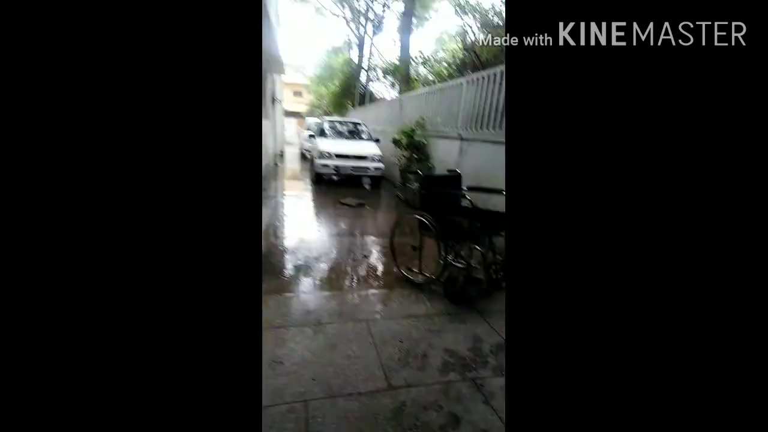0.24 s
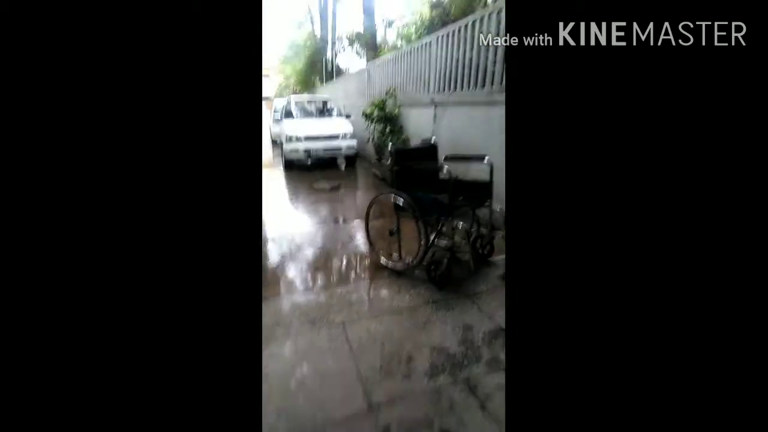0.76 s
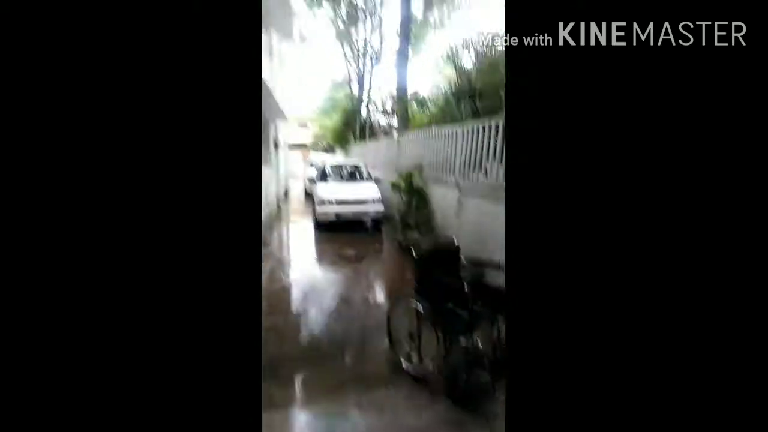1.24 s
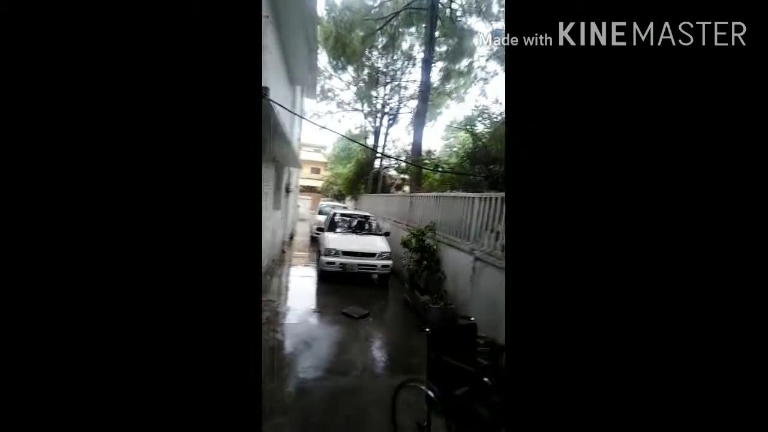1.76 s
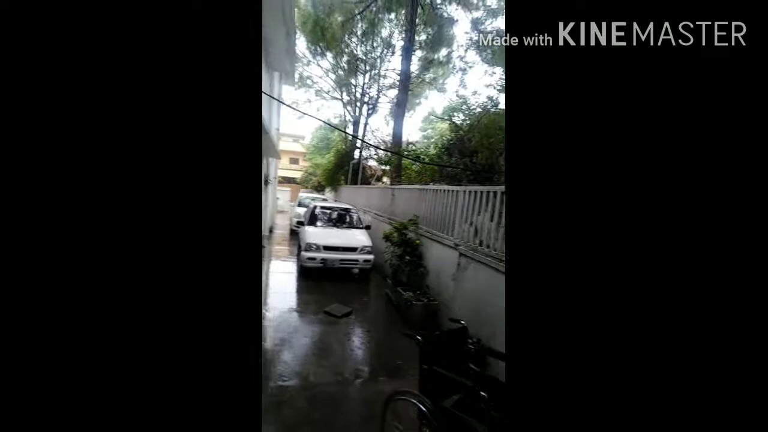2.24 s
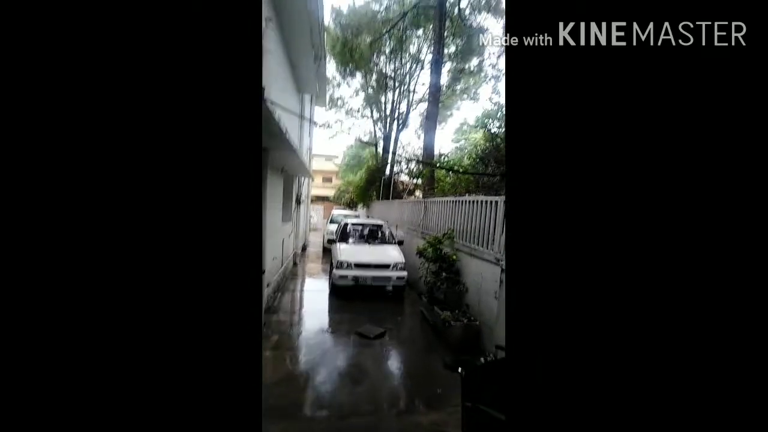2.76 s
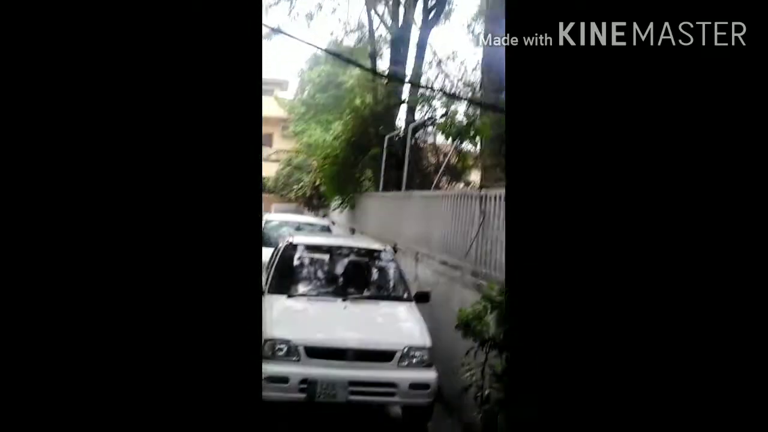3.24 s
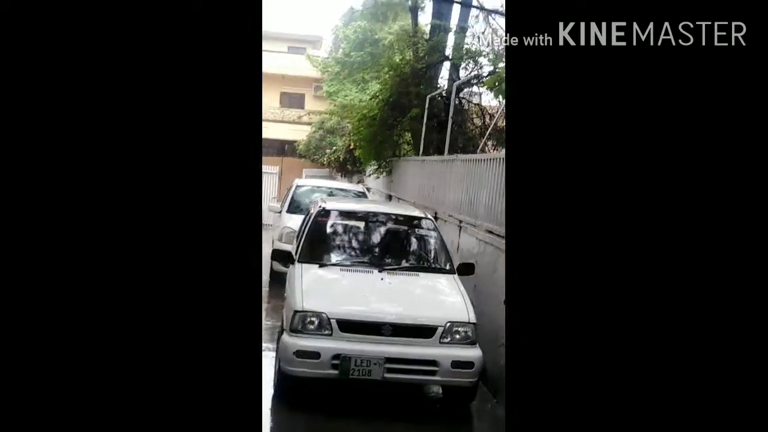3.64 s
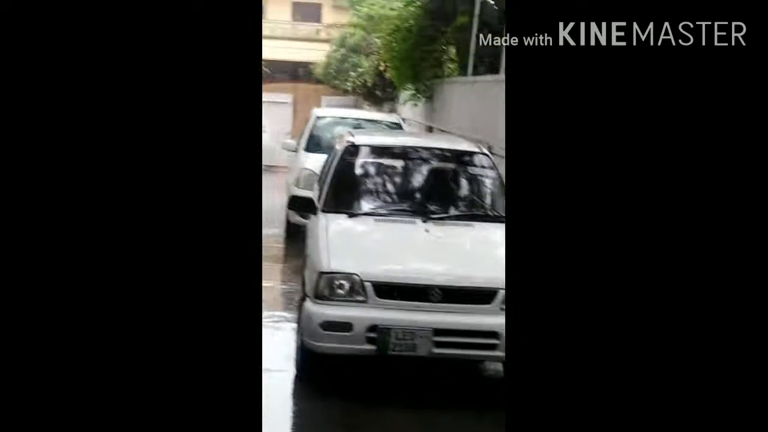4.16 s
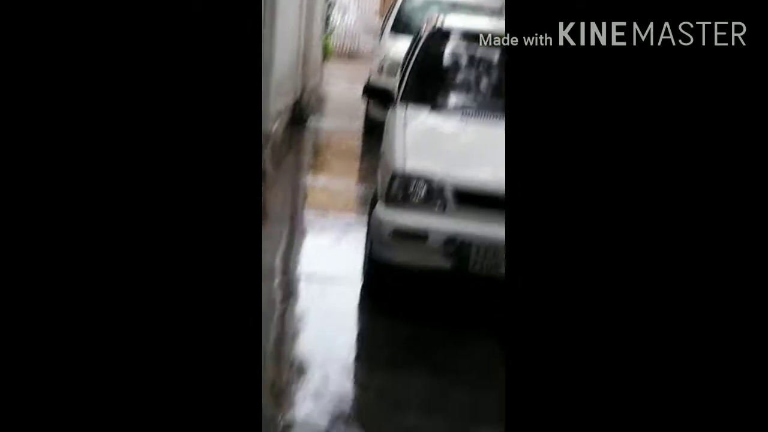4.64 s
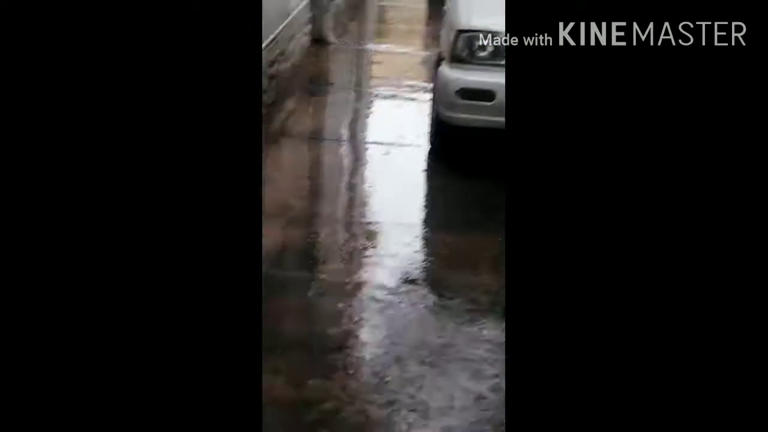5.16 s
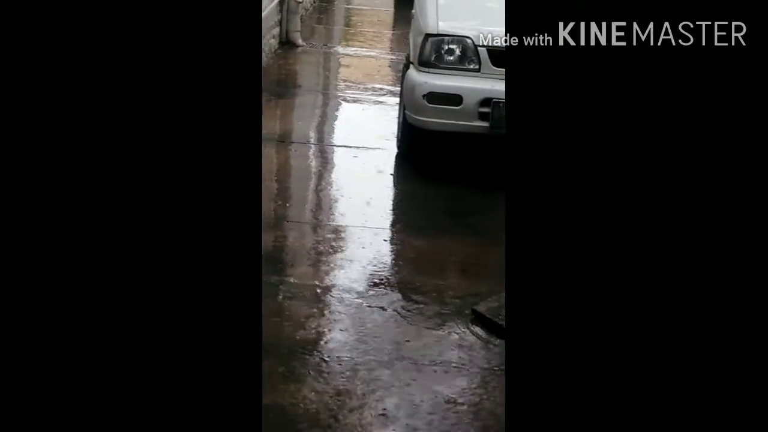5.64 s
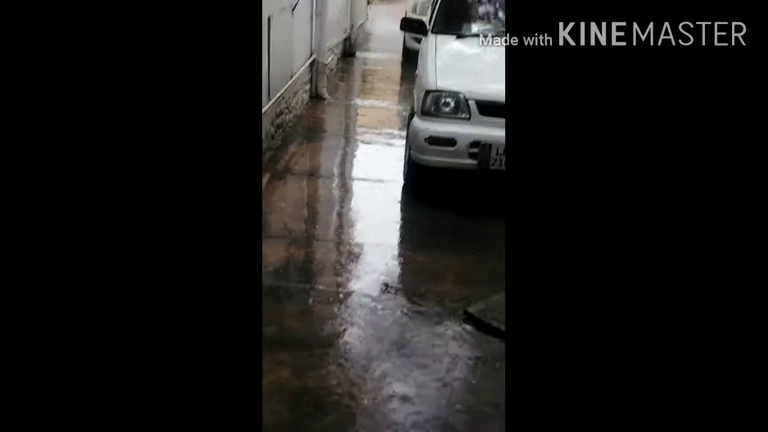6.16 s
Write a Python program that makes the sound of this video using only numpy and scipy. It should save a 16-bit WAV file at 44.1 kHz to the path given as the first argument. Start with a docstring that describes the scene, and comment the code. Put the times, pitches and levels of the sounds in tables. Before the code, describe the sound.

A handheld phone hears wide stereo rain on wet paving beside a house wall. The hiss is bright and continuous, gently fluctuating, with fine pattering. After a momentary early silence it climbs back; then fingers bump and judder over the casing. Soft shoe scuffs pass almost unnoticed. Scattered eaves drips click and splash with short outdoor reflections, loudest right at the end, over very quiet traffic rumble and engine hum.

```python
"""Steady rain on a driveway

A paved driveway between a house and a garden wall, heard in two channels from a hand-held phone.
Far drops merge into a noise hiss, nearer ones patter as short resonances, and fat drips from the eaves
smack the wet paving as noise bursts with a dying splash. Behind lie the town's rumble and an engine's wavering
hum; close by, shoes scuff softly, fingers brush and bump the casing and the hand judders over it once.
Early on the sound drops out for a moment, reopens quietly and climbs back."""
import sys
import numpy as np
from scipy import signal
from scipy.fft import rfft, irfft
from scipy.io import wavfile

SR = 44100
rng = np.random.default_rng(int(sys.argv[2]) if len(sys.argv) > 2 else 0)


def put_to_file(sound):
    """Save the sound as 16-bit audio at rate SR, in the file named by the first command-line argument."""
    columns = np.atleast_2d(sound).T  # one column per channel
    safe = np.clip(columns, -1, 1)
    whole_steps = np.round(safe * 32767)
    wavfile.write(sys.argv[1], SR, whole_steps.astype(np.int16))


N = 282240
TIME = np.arange(N) / SR
FREQS = np.maximum(np.arange(N // 2 + 1) * SR / N, 1)

# Distant town, slow course of the rumble before its wander: (time [s], level [dB])
TOWN_COURSE = [(0, -45), (.55, -48), (2.1, -48.8), (3.2, -47.5), (6.4, -46.5)]
# Colour of the town, only its shape counts: (frequency [Hz], density [dB per Hz])
RUMBLE_SPECTRUM = [(20, -25), (36, -29), (50, -11), (66, -4.5), (100, 3), (160, 1), (240, 1), (350, -1.5),
                   (500, -5.5), (900, -13.5), (1600, -23), (4000, -38)]
# Soft shoe scuffs: (time [s], level [dB], spread of the swell [s], pitch [Hz])
SHOE_SCUFFS = [(1.034, -35, .019, 850), (1.367, -40.5, .018, 1190), (3.537, -41, 0.066, 1700),
               (3.70, -40, 0.021, 1570), (5.723, -41, .04, 2420)]
# Fingers brush the casing, level ahead of the skin filter: (time [s], level [dB], spread of the swell [s])
FINGER_BRUSHES = [(.76, -48.5, 0.086), (5.925, -47.5, 0.075)]
# Fingers bump the casing, peak ahead of the skin filter:
# (time [s], peak [dB], pitch [Hz], time to fall by 60 dB [s])
CASING_BUMPS = [(.135, -38, 150, .1), (.205, -35.5, 130, 0.069), (.70, -38, 236, 0.42), (.88, -39, 221, .2),
                (1.0161, -27, 247, 0.1), (1.106, -33, 111, 0.13), (3.2998, -18.5, 190, .016)]
# Fat drips on the paving, level ahead of the water film:
# (time [s], smack level [dB], pitch [Hz], splash time constant [s])
EAVES_DRIPS = [(0.52, -12, 10500, .001), (.636, -26, 6000, 0.014), (1.14, -19, 6500, .021),
               (1.9, -26, 6000, .007), (2.717, -24, 8500, .024), (3.171, -24, 5030, .014),
               (3.563, -30, 4200, .04), (3.8013, -24, 5800, 0.03), (3.888, -19, 8440, .016),
               (4.434, -13.5, 6300, .015), (4.937, -23, 6950, 0.021), (6.047, -26, 4600, .01),
               (6.194, -21.5, 3200, .014), (6.199, -20.5, 8000, .02), (6.368, -6.5, 5400, .002),
               (6.3726, -7, 7500, .001), (6.3785, -14, 7500, .003)]
# Strength of the shower, to which spray and wash add their offsets: (time [s], level [dB])
SHOWER_COURSE = [(0, -36), (.09, -35.2), (.16, -37.6), (.95, -39.5), (1.22, -37), (1.5, -38.9),
                 (1.85, -37.5), (2.48, -38), (2.67, -39.8), (2.77, -36.4), (3.75, -36.5), (4.1, -36.5),
                 (4.6, -37), (5.5, -36), (5.95, -37), (6.4, -35.5)]
# Colour of the bright spray, only its shape counts: (frequency [Hz], density [dB per Hz])
SPRAY_SPECTRUM = [(1200, -29), (2500, -6.5), (3600, -3.5), (5000, -2), (6500, -1), (7800, 0.5), (10000, -4),
                  (12500, -11.5), (14500, -11.5)]
# Colour of the duller wash, only its shape counts: (frequency [Hz], density [dB per Hz])
WASH_SPECTRUM = [(200, -17), (420, -4.5), (650, -1), (900, -4.5), (1200, -3), (1900, -1), (2700, -3),
                 (3800, -7), (7000, -16)]
# How alike the two channels hear the hiss of the wash: (frequency [Hz], correlation [-1 to 1])
WASH_LIKENESS_CURVE = [(200, 0.44), (550, 0.18), (950, 0.4), (1500, 0.12), (3000, 0.12)]
# Colour of the left channel: (frequency [Hz], gain [dB])
LEFT_COLOUR = [(100, -0.3), (400, 1), (490, -3.5), (590, -21), (680, -26), (760, -26), (890, 0.5),
               (2100, 2), (2800, -2.5), (4700, 2), (5900, 2), (8000, -8), (11500, -12), (14000, -48)]

TOWN_WANDER_DB = 1.27
HUM_HZ, HUM_DB = 76.5, -54   # mean pitch; mean level at the engine's nearest
HUM_NEAREST_S, HUM_PASS_S = 4.05, 1.7   # moment it is nearest; time from there to fall by 3 dB
SCUFF_WIDTH_HZ = 1400
RUB_START_S, RUB_DB = 1.013, -27.5   # the hand slips over the casing; level ahead of the skin filter
RUB_ATTACK_S, RUB_HOLD_S, RUB_RELEASE_S = 0.0075, 0.061, 0.012   # the release is a time constant
JUDDER_START_HZ, JUDDER_SLOWING_S, JUDDER_SAG = 290, .008, .38   # slows as a power of time; sag: exponent
SMACK_S, ATTACK_S = .001, .0005   # time constant of the smack; rise time of a drip's soft onset
SPLASH_DB, SPLASH_FOLLOWS = -16, .5   # splash of a 0 dB smack; splash dB per dB of smack
PORT_LAG_S = .0004   # largest lag of a drop between the ports
SPRAY_DB, WASH_DB, WASH_FOLLOWS = 4.5, -9, 0.81   # offsets; the wash's share of the shower curve in dB
MUTE_START_S, MUTE_END_S, MUTE_DB = 0.252, 0.3803, -67   # the dropout and its floor
MUTE_STEP_DB, MUTE_FALL_DB_PER_S = -20.5, 1306   # it drops at once, then dies away
REOPEN_S, RETURN_DB, RETURN_S = 0.021, -8, .27   # it comes back quiet and climbs to full level
CUTOFF_HZ = 14300


def from_db(db):
    """Decibels to gain."""
    return 10 ** (np.asarray(db) / 20)


def rms_one(x):
    """Scale to an rms of 1."""
    return x / np.sqrt(np.mean(x ** 2) + 1e-20)


def in_time(rows):
    """Each column of a curve at every sample."""
    s, *columns = np.transpose(rows)
    return [np.interp(TIME, s, c) for c in columns]


def over_hz(points):
    """A table joined by straight lines over log frequency."""
    hz, value = np.transpose(points)
    return np.interp(np.log(FREQS), np.log(hz), value)


def coloured(x, spectrum):
    """Give a signal a spectral shape."""
    return irfft(rfft(x) * from_db(over_hz(spectrum)), N)


def drift(rate_hz, size=4096):
    """Smooth random wandering with an rms of 1."""
    slow = rfft(rng.standard_normal(size))
    slow = slow / (1 + (FREQS[:len(slow)] / rate_hz) ** 2)
    return rms_one(irfft(slow, N))


def swell(s, length):
    """A smooth bell-shaped rise and fall around a moment."""
    return np.exp(-.5 * ((TIME - s) / length) ** 2)


def stereo_noise(alike):
    """White noise with a given correlation between the channels, mixed from a common and an opposed part."""
    mid, side = rfft(rng.standard_normal((2, N)))
    alike = np.clip(alike, -1, 1)
    common = np.sqrt(1 + alike) * mid
    opposed = np.sqrt(1 - alike) * side * [[1], [-1]]
    return rms_one(irfft(common + opposed, N))


def resonate(x, hz, width_hz):
    """A two-pole resonance with a gain of about 1 on top."""
    r = np.exp(-np.pi * width_hz / SR)
    feedback = [1, -2 * r * np.cos(2 * np.pi * hz / SR), r * r]
    return signal.lfilter([(1 - r * r) / 2, 0, (r * r - 1) / 2], feedback, x + 1e-18)


def driveway(x, t60, wet_db):
    """Scattered reflections between the house and the wall: a decaying noise tail after a 4 ms gap."""
    t = TIME[:SR // 2]
    tail = rng.standard_normal((2, len(t))) * from_db(-60 * t / t60) * (t > .004)
    tail /= np.sqrt(np.sum(tail ** 2, axis=1, keepdims=True))
    return x + from_db(wet_db) * signal.fftconvolve(x, tail, axes=1)[:, :N]


def town_rumble():
    """Far traffic: low noise, nearly the same in both channels, wandering in level."""
    level_db = in_time(TOWN_COURSE)[0] + TOWN_WANDER_DB * drift(5.4)
    return rms_one(coloured(stereo_noise(0.93), RUMBLE_SPECTRUM)) * from_db(level_db)


def engine_hum():
    """One far engine, a wavering tone that slowly draws near and moves on, its level falling with distance."""
    phase = 2 * np.pi * np.cumsum(HUM_HZ + 1.6 * drift(4.6)) / SR
    distance = np.hypot(1, (TIME - HUM_NEAREST_S) / HUM_PASS_S)
    return np.sqrt(2) * np.sin(phase) * from_db(HUM_DB + 2.5 * drift(3.4)) / distance


def scuffs():
    """Soles brush the wet, gritty floor: swells of noise through a broad double resonance."""
    grit = stereo_noise(0.46)
    out = 0
    for s, db, length, hz in SHOE_SCUFFS:
        brush = resonate(resonate(grit, hz, SCUFF_WIDTH_HZ), hz, SCUFF_WIDTH_HZ)
        out = out + from_db(db) * swell(s, length) * rms_one(brush)
    return out * from_db([[1.0], [-1.0]])   # left up, right down


def handling():
    """Skin judders over the casing ever more slowly, and fingers brush and bump it, alike at both ports."""
    since = np.maximum(TIME - RUB_START_S, 0)
    hz = JUDDER_START_HZ * (1 + since / JUDDER_SLOWING_S) ** -JUDDER_SAG
    phase = 2 * np.pi * np.cumsum(hz * from_db(0.294 * drift(58))) / SR
    judder = np.sin(phase) + from_db(-13 + 2 * drift(30)) * np.sin(2 * phase)
    friction = rms_one(resonate(resonate(rng.standard_normal(N), 226, 260), 226, 260))

    release = np.exp(-np.clip(since - RUB_ATTACK_S - RUB_HOLD_S, 0, 1) / RUB_RELEASE_S)
    rub = from_db(RUB_DB) * np.minimum(since / RUB_ATTACK_S, 1) * release
    brushing = sum(from_db(db) * swell(s, length) for s, db, length in FINGER_BRUSHES)
    out = (judder + from_db(-12) * friction) * rub + friction * brushing
    for s, peak_db, bump_hz, t60 in CASING_BUMPS:
        age = np.clip(TIME - s, 0, 1)
        out = out + from_db(peak_db - 60 * age / t60) * np.sin(2 * np.pi * bump_hz * age)
    # soft skin passes only the bass, and the ports are deaf to the very bottom
    return signal.sosfilt(signal.butter(3, [60, 380], "band", fs=SR, output="sos"), out)


def drips():
    """A drip smacks the wet stone, then its splash rains back as a dying crackle of the same noise."""
    out, t = np.zeros((2, N + SR // 4)), TIME[:SR // 4]
    for s, smack_db, hz, decay_s in EAVES_DRIPS:
        band = signal.butter(1, [0.76 * hz, min(1.28 * hz, 14000)], "band", fs=SR, output="sos")
        crackle = from_db(2 * rng.standard_normal(len(t)))
        grit = rms_one(signal.sosfilt(band, rng.standard_normal((2, len(t))) * crackle))
        smack = from_db(smack_db) * np.exp(-t / SMACK_S)
        splash = from_db(SPLASH_DB + SPLASH_FOLLOWS * smack_db) * np.exp(-t / decay_s)
        at = int(s * SR)
        out[:, at:at + len(t)] += grit * (smack + splash) * np.minimum(t / ATTACK_S, 1)
    # a thin water film: no bass, a soft top
    film = signal.butter(2, [1300, 11000], "band", fs=SR, output="sos")
    near = signal.sosfilt(film, out[:, :N] + 1e-18) * from_db([[-2.5], [0]])
    return driveway(near, t60=.18, wet_db=-8)


def impacts(per_s, spread_db, largest=3.9):
    """Drops land at random, mostly small, and reach the two ports with a lag set by their direction."""
    count = int(per_s * N / SR)
    when, size, direction, sign = rng.random((count, 4)).T
    height = from_db(spread_db * np.minimum(-np.log(1 - size), largest)) * np.sign(sign - .5)
    lag = (2 * direction - 1) * PORT_LAG_S
    ports = []
    for side in (1, -1):
        at = ((when * N + side * lag * SR / 2) % N).astype(int)
        ports.append(np.bincount(at, height, N))
    return np.array(ports)


def patter(per_s, spread_db, low_hz, high_hz, damping, clump_db, count=10):
    """Drops ring briefly at one of several pitches; each pitch is a patch of ground with its own flurries."""
    out = 0
    for hz in np.geomspace(low_hz, min(high_hz, .45 * SR), count):
        patch = impacts(per_s / count, spread_db) * from_db(clump_db * drift(10.7))
        out = out + resonate(patch, hz, damping * hz)
    return rms_one(out)


def rain():
    """Bright spray off the paving and a duller wash from puddles and leaves: far hiss plus nearer drops."""
    shower_db, = in_time(SHOWER_COURSE)
    ticks = patter(per_s=2200, spread_db=1.5, low_hz=2930, high_hz=12800, damping=0.35, clump_db=5.0, count=12)
    plops = patter(per_s=900, spread_db=3.5, low_hz=703.5, high_hz=4216, damping=0.06, clump_db=4.0, count=22)
    ticks, plops = (rms_one(driveway(drops, t60=0.11, wet_db=-1)) for drops in (ticks, plops))

    spray = rms_one(coloured(stereo_noise(0) + from_db(-5.5) * ticks, SPRAY_SPECTRUM))
    wash_hiss = stereo_noise(over_hz(WASH_LIKENESS_CURVE))
    wash = rms_one(coloured(wash_hiss + from_db(-9.5) * plops, WASH_SPECTRUM))

    flurry_db = 0.59 * drift(3.7)   # shared by spray and wash
    spray_db = SPRAY_DB + shower_db + flurry_db + 0.38 * drift(36)
    wash_db = WASH_DB + WASH_FOLLOWS * shower_db + flurry_db + 0.33 * drift(14)
    return spray * from_db(spray_db) + wash * from_db(wash_db)


def dropout():
    """Gain of the brief silence: a sudden drop, a quick reopening, a slow climb back."""
    fall_db = MUTE_FALL_DB_PER_S * np.clip(TIME - MUTE_START_S, 0, 1)
    closing = np.where(TIME < MUTE_START_S, 1, from_db(MUTE_STEP_DB - fall_db))
    since = np.maximum(TIME - MUTE_END_S, 0)
    climb = from_db(RETURN_DB * np.maximum(1 - since / RETURN_S, 0))
    opening = np.minimum(since / REOPEN_S, 1) * climb
    return closing + opening + from_db(MUTE_DB)


def scene():
    """Everything that reaches the phone, from the far town to the rain."""
    return town_rumble() + engine_hum() + scuffs() + handling() + drips() + rain()


def record(dry):
    """The left channel is hollow near 700 Hz and dull on top; the sound drops out once; the top is cut."""
    channels = np.array([coloured(dry[0], LEFT_COLOUR), dry[1]]) * dropout()
    return signal.sosfilt(signal.ellip(12, .1, 80, CUTOFF_HZ, fs=SR, output="sos"), channels)


dry = scene()
out = record(dry)
put_to_file(out)
```